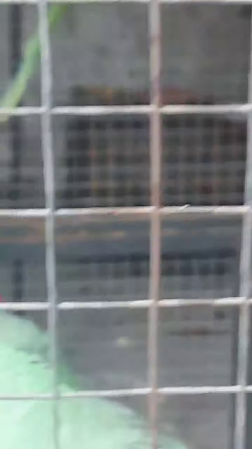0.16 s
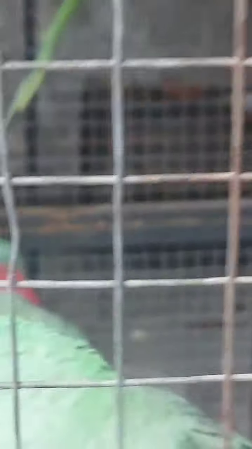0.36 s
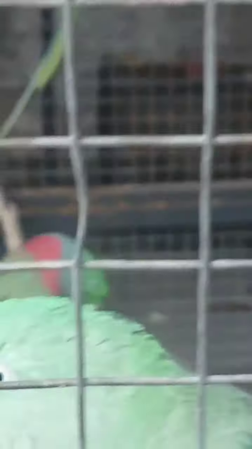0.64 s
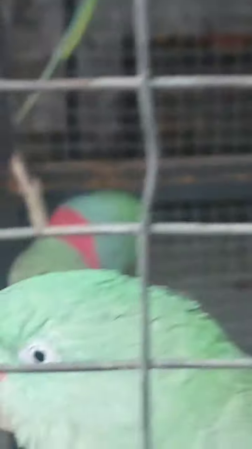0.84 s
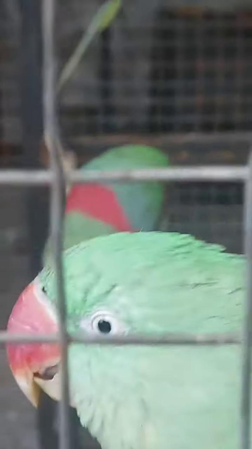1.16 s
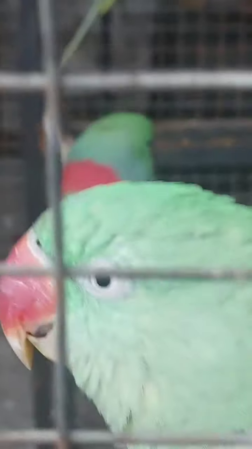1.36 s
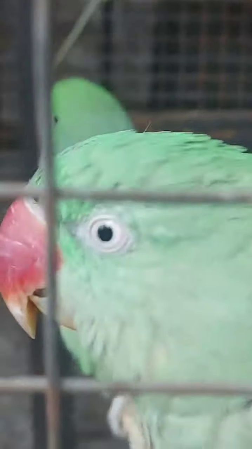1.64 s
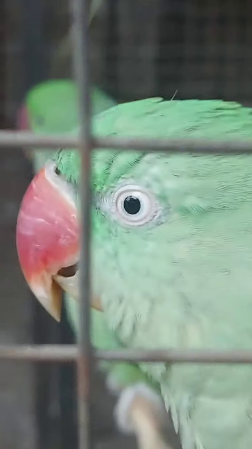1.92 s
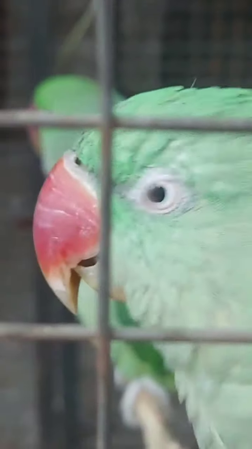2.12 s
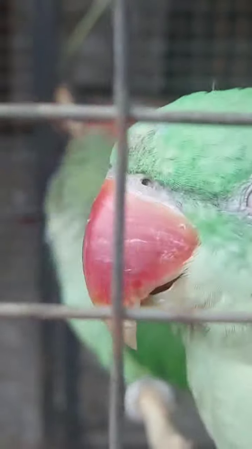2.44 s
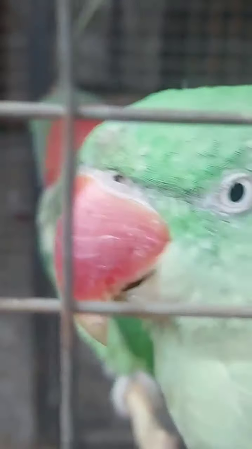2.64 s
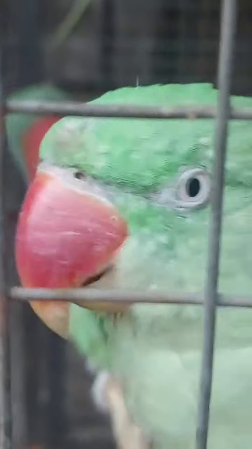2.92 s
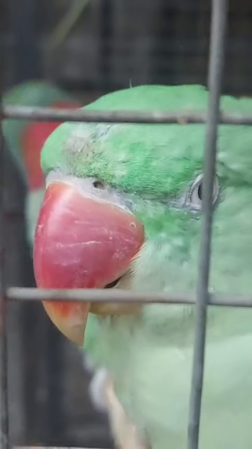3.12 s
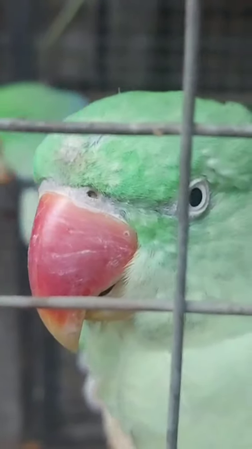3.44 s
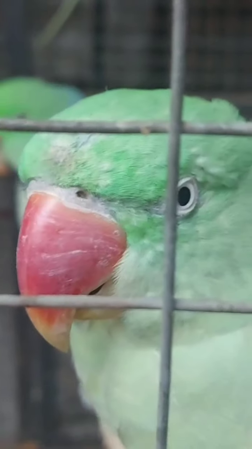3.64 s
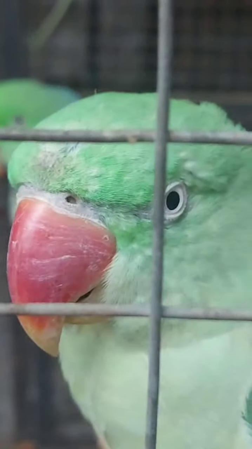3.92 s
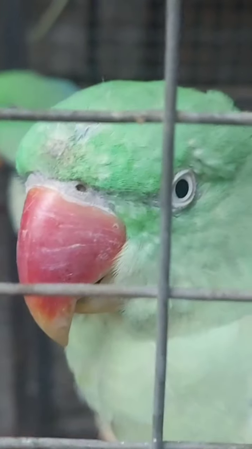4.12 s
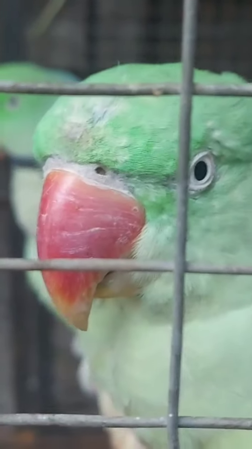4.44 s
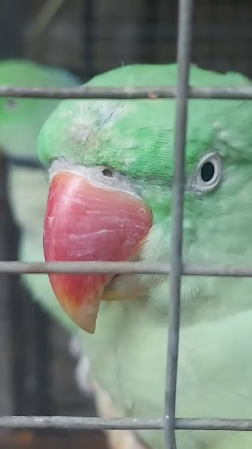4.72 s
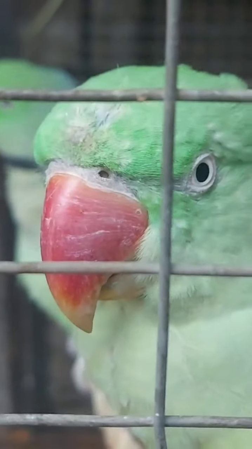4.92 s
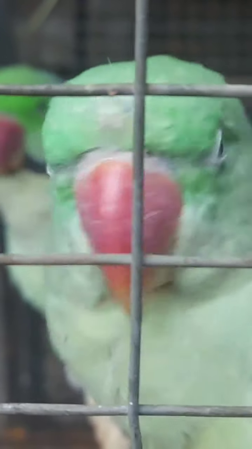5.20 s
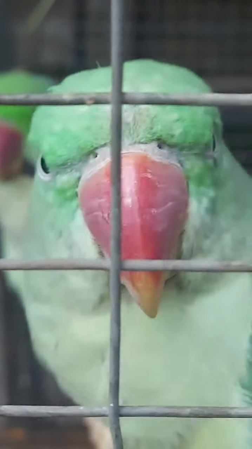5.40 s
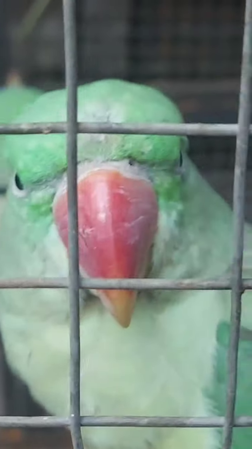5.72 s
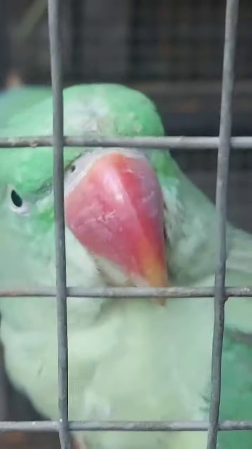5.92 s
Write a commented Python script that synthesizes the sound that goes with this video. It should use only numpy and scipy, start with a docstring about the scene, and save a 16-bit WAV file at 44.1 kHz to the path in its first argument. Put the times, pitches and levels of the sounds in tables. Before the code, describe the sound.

A parakeet whistles three gliding calls close by, then harsh throbbing squawks and small high chirps follow over faint traffic rumble.

```python
"""A parakeet whistles three gliding calls close by, in a wire aviary with hard, reflecting walls.
Smaller birds put in two- and three-note chirps, and a bird to the right answers with throbbing squawks.
Each voice is a source and a filter: membranes in the syrinx vibrate, throat and beak weight their
partials, and breath adds noise. Traffic rumble, a motor hum and faint air noise lie underneath."""
import sys
import numpy as np
from scipy import signal
from scipy.fft import rfft, irfft
from scipy.io import wavfile
from scipy.ndimage import uniform_filter1d

SR = 44100
rng = np.random.default_rng(int(sys.argv[2]) if len(sys.argv) > 2 else 0)


def put_to_file(sound):
    """Save the sound as 16-bit audio at rate SR, in the file named by the first command-line argument."""
    columns = np.atleast_2d(sound).T  # one column per channel
    safe = np.clip(columns, -1, 1)
    whole_steps = np.round(safe * 32767)
    wavfile.write(sys.argv[1], SR, whole_steps.astype(np.int16))


N = 267201


def amp(db):
    """Amplitude ratio: a factor of ten per 20 dB."""
    return 10 ** (np.asarray(db) / 20)


def unit_rms(x):
    """Normalisation to unit mean power."""
    return x / np.sqrt(np.mean(x ** 2) + 1e-20)


def at_hz(points, hz):
    """Interpolation of (f/Hz, value) rows on a logarithmic frequency axis."""
    table_hz, values = np.transpose(points)
    return np.interp(np.log(hz), np.log(table_hz), values)


def envelope(points):
    """Amplitude envelope of the whole scene, interpolated from (t/s, level/dB) rows."""
    return amp(np.interp(np.arange(N) / SR, *np.transpose(points)))


def contours(rows):
    """Linear interpolation of each column after t/s, over the span of one call."""
    times, *columns = np.transpose(rows)
    return [np.interp(np.arange(times[0], times[-1], 1 / SR), times, c) for c in columns]


def wander(size, rate_hz):
    """Random fluctuation: white noise through a two-pole low-pass, at unit rms."""
    r = np.exp(-2 * np.pi * rate_hz / SR)
    return unit_rms(signal.lfilter([1], [1, -2 * r, r * r], rng.standard_normal(size + 9000))[9000:])


def coloured(x, spectrum):
    """Linear filtering: the spectrum is weighted by (f/Hz, gain/dB) rows."""
    hz = np.maximum(np.fft.rfftfreq(x.shape[-1], 1 / SR), 1)
    return irfft(rfft(x) * amp(at_hz(spectrum, hz)), x.shape[-1])


def add(out, start_s, sound, fade_s):
    """Superposition of one sound, faded at both ends."""
    i, k = round(start_s * SR), np.arange(len(sound))
    sound = sound * np.minimum(1, np.minimum(k, k[::-1]) / (fade_s * SR))
    out[i:i + len(sound)] += sound[:N - i]


# Likeness of left and right: f/Hz, coherence (before clipping to 0-1)
COHERENCE = [(60, 1), (240, 0.93), (950, 0.45), (3770, -1.4), (15000, 0.132)]
def diffuse_noise(spectrum):
    """A diffuse field is coherent at two nearby points only at long wavelengths; unit rms."""
    hz = np.maximum(np.fft.rfftfreq(N, 1 / SR), 1)
    coherence = np.clip(at_hz(COHERENCE, hz), 0, 1)
    mid, side = rfft(rng.standard_normal((2, N)))
    pair = np.sqrt(1 + coherence) * mid + np.sqrt(1 - coherence) * side * [[1], [-1]]
    return unit_rms(irfft(pair * amp(at_hz(spectrum, hz)), N))


# Swell of the rumble and the hum: t/s, level/dB
RUMBLE_SWELL = [(0.0, -36), (0.39, -40), (0.72, -34), (0.96, -40.5), (2.33, -43), (2.58, -40), (2.92, -43),
                (4.12, -39), (4.39, -44), (4.72, -44), (6.06, -44.5)]
# Traffic spectrum: f/Hz, relative spectral level/dB
TRAFFIC_SPECTRUM = [(26, -49), (45, -1.5), (102, 0), (183, -8.5), (278, -9.5), (409, -14.5), (724, -20),
                    (1800, -28), (2340, -27.5), (3960, -120)]
def traffic_rumble():
    """Low-frequency noise under slow amplitude modulation."""
    return envelope(RUMBLE_SWELL) * diffuse_noise(TRAFFIC_SPECTRUM)


def motor_hum(centre_hz=113, bandwidth_hz=4):
    """A sharp resonance driven by noise gives a wavering tone; it swells with the rumble."""
    r = np.exp(-np.pi * bandwidth_hz / SR)
    resonator = [1, -2 * r * np.cos(2 * np.pi * centre_hz / SR), r * r]
    return envelope(RUMBLE_SWELL) * unit_rms(signal.lfilter([1], resonator, rng.standard_normal(N)))


# Hiss, a little louder once the flock joins in: t/s, level/dB
AIR_RISE = [(1.5, -54), (2.5, -48)]
# Hiss spectrum: f/Hz, relative spectral level/dB
AIR_SPECTRUM = [(900, -36), (1300, -7.5), (2500, -6.5), (4000, -2), (7500, -4), (9500, -12), (12500, -10.5),
                (15900, -19)]
def air_noise():
    """Diffuse broadband noise, heard as a faint hiss."""
    return envelope(AIR_RISE) * diffuse_noise(AIR_SPECTRUM)


def syrinx(pitch_hz, throat, breath_spectrum, hoarse, jitter, orders,
           tilt_db=0, upper_db=0, half_db=0, phase_shift=0):
    """Source-filter principle: throat and beak weight the membranes' partials; hoarseness adds breath."""
    pitch_hz = pitch_hz * (1 + jitter * wander(len(pitch_hz), 179))
    phase = 2 * np.pi * np.cumsum(pitch_hz) / SR + phase_shift
    tone, power = 0, 1e-12
    for k in orders:
        source_db = tilt_db * np.log2(min(k, 3)) + upper_db * (k > 3) + half_db * (k % 1 > 0)
        gain = amp(source_db + at_hz(throat, k * pitch_hz)) * (k * pitch_hz < 17000)
        tone += gain * np.sin(k * phase + k * k)
        power += gain ** 2 / 2
    breath = unit_rms(coloured(rng.standard_normal(len(phase)), breath_spectrum))
    breath_share = np.clip(hoarse, 0, 1) ** 2
    return np.sqrt(1 - breath_share) * tone / np.sqrt(power) + np.sqrt(breath_share) * breath


# Pitch glides, one list per call: t/s, f/Hz, relative level/dB
WHISTLE_GLIDES = [
    [(0.015, 704, -61), (0.037, 753, -38.5), (0.099, 886, -33), (0.141, 1057, -16), (0.173, 1320, -12.5),
     (0.19, 1386, -35)],
    [(0.3, 738, -46), (0.334, 773, -39.5), (0.4, 894, -26), (0.464, 1219, -10), (0.484, 1396, -16),
     (0.5, 1392, -36)],
    [(0.66, 716, -43), (0.702, 732, -31), (0.81, 1010, -14), (0.872, 1385, -9), (0.9, 1464, -13),
     (0.97, 1455, -13), (1.022, 1412, -14.5), (1.11, 1222, -16), (1.308, 870, -28), (1.402, 784, -39.5),
     (1.42, 739, -94)],
]
# Resonances of throat and beak: f/Hz, gain/dB
WHISTLE_FORMANTS = [(700, -12.5), (1400, 9), (2200, 12), (2900, 1), (3600, -12.5), (4300, -25), (4900, -35),
                    (5800, -15.5), (6500, -27.5), (7600, -13), (8600, -36), (9600, -52), (11500, -31),
                    (13000, -36), (15000, -37)]
# Breath noise: f/Hz, relative spectral level/dB
WHISTLE_BREATH_SPECTRUM = [(1200, -8), (2500, -8), (5000, -10.5), (7800, -2.5), (10000, -8), (12200, -9),
                           (15500, -48)]
# Slope up to the third partial, brighter on high notes: fundamental f/Hz, slope/(dB per octave)
WHISTLE_TILT = [(750, -26), (880, -14), (1050, -5.5), (1220, 10), (1450, 19)]
# Lift of the partials above the third: fundamental f/Hz, gain/dB
WHISTLE_UPPER_LIFT = [(750, 1), (950, 7.5), (1150, 4.5), (1300, -2.5), (1450, -2.5)]
# Breathiness of a rising note: fundamental f/Hz, hoarseness (0-1)
WHISTLE_BREATHINESS = [(750, .03), (1100, .07), (1400, .04)]
def whistles():
    """Harmonic glides; on high notes a slower oscillation modulates level and phase, adding sidebands."""
    out = np.zeros(N)
    for glide in WHISTLE_GLIDES:
        pitch_hz, level_db = contours(glide)
        rising = uniform_filter1d(1. * (np.gradient(pitch_hz) > 0), size=900)
        hoarse = rising * at_hz(WHISTLE_BREATHINESS, pitch_hz)
        depth = .07 * np.clip((pitch_hz - 1150) / 250, 0, 1)
        slow_phase = 2 * np.pi * np.cumsum(.28 * pitch_hz) / SR
        tremble = amp(wander(len(pitch_hz), 110)) * (1 + depth * np.cos(slow_phase))
        voice = syrinx(pitch_hz, WHISTLE_FORMANTS, WHISTLE_BREATH_SPECTRUM, hoarse,
                       jitter=0.13 * hoarse, orders=np.arange(1, 16),
                       tilt_db=at_hz(WHISTLE_TILT, pitch_hz),
                       upper_db=at_hz(WHISTLE_UPPER_LIFT, pitch_hz),
                       phase_shift=depth * np.sin(slow_phase))
        add(out, glide[0][0], amp(level_db) * tremble * voice, fade_s=.006)
    return out


# Notes of the smaller birds: t/s, duration/s, start f/Hz, end f/Hz, relative level/dB
CHIRP_NOTES = [(1.642, 0.074, 5300, 5660, -68), (2.585, 0.061, 6520, 6950, -48.5),
               (2.601, 0.043, 4590, 4655, -39), (2.875, 0.021, 2567, 2495, -33.5),
               (2.895, 0.014, 6580, 6870, -24.5), (3.085, 0.031, 2514, 2557, -41.5),
               (3.106, 0.034, 6520, 6720, -32.5), (3.322, 0.061, 2224, 2530, -45.5),
               (3.356, 0.1, 4710, 4440, -36), (3.387, 0.017, 2680, 2640, -31.5),
               (3.399, 0.042, 6880, 6110, -31), (3.728, 0.021, 3020, 4220, -48),
               (3.739, 0.028, 2470, 2710, -34.5), (3.76, 0.022, 6190, 6250, -27),
               (4.472, 0.048, 2414, 2350, -38.5), (4.486, 0.083, 6100, 6410, -37.5),
               (4.701, 0.054, 2427, 2425, -39), (4.719, 0.036, 6230, 6320, -34),
               (5.11, 0.053, 2433, 2295, -40.5), (5.132, 0.043, 5960, 6120, -32),
               (5.163, 0.041, 5170, 5050, -36), (5.45, 0.042, 2415, 2353, -40.5),
               (5.471, 0.033, 6460, 6070, -28), (5.506, 0.022, 5180, 5320, -32)]
# Resonances of throat and beak: f/Hz, gain/dB
CHIRP_FORMANTS = [(2400, -3.5), (5000, 8), (6500, 9.5), (7500, 1.5), (10000, -10), (12800, -4.5),
                  (15500, -16)]
def chirps(clear_db=-33):
    """Short linear sweeps, whose partials are broadened by random modulation of level and pitch."""
    out = np.zeros(N)
    for start_s, length_s, start_hz, end_hz, level_db in CHIRP_NOTES:
        pitch_hz = np.linspace(start_hz, end_hz, round(length_s * SR))
        hoarse = .017 * (clear_db - level_db)   # weaker notes are breathier
        jitter = max(.022, .5 * length_s)   # longer notes are scratchier
        flutter = amp(3.26 * wander(len(pitch_hz), 450))
        breath_band = [(.58 * end_hz, -30), (.88 * end_hz, 0), (1.07 * end_hz, 0),
                       (1.7 * end_hz, -14), (16000, -20)]
        voice = syrinx(pitch_hz, CHIRP_FORMANTS, breath_band, hoarse, jitter, orders=np.arange(1, 7))
        add(out, start_s, amp(level_db) * flutter * voice, fade_s=.01)
    return out


def squawk_stages(start_s, rasp_s, voice_s, start_hz, end_hz, rasp_db, early_db, late_db, half_db):
    """Regimes of oscillation: a noisy rasp, a clear tone, period doubling (half-order partials), decay."""
    catch_s, swell_s, break_s, release_s = .0092, .036, .016, .013
    onset = start_s + rasp_s
    swollen, end = onset + catch_s + swell_s, onset + voice_s
    broken = end - release_s
    held = broken - break_s
    # t/s, level offset/dB, half-order gain/dB, hoarseness (0-1)
    times, offset_db, halves_db, hoarse = np.transpose([
        (start_s, -4.8, -1.5, .55),
        (onset, 2.7, -2.1, .9),
        (onset + catch_s, -5.5, -48, .27),
        (swollen, 0, -70, .017),
        ((swollen + held) / 2, 0, half_db, .02),
        (held, 0, half_db, .02),
        (broken, 1, -5, .32),
        (end, -8, -15, .3)])
    voice_db = np.interp(times, [swollen, held], [early_db, late_db])
    level_db = offset_db + np.where(times <= onset, rasp_db, voice_db)
    sag = np.clip((times - onset) / voice_s, 0, 1) ** .69   # the pitch falls fastest early on
    release_drop_hz = 95 * (times > broken)
    pitch_hz = start_hz + (end_hz - start_hz) * sag - release_drop_hz
    return np.transpose([times, pitch_hz, level_db, halves_db, hoarse])


# Answering calls: t/s, rasp duration/s, voice duration/s, start f/Hz, end f/Hz,
# relative level/dB (rasp, early, late), mid-call half-order gain/dB, throb f/Hz
SQUAWK_CALLS = [(1.748, 0.03, 0.19, 2235, 2006, -40.5, -25, -22, -16, 101.5),
                (2.086, 0.013, 0.15, 2250, 2028, -34.5, -22, -21, -3, 83.5),
                (2.366, 0.016, 0.15, 2243, 2083, -33.5, -23, -24, -1, 94),
                (2.644, 0.015, 0.14, 2212, 2062, -33.5, -22.5, -24, 3, 82),
                (4.153, 0.031, 0.19, 2210, 1942, -28, -17.5, -22, -20, 92),
                (4.47, 0.027, 0.17, 2200, 1975, -36, -20, -21, -11, 76),
                (4.783, 0.01046, .164, 2210, 2014, -32.5, -23, -22, -3, 90.5),
                (5.678, 0.017, 0.17, 2083, 1873, -36.5, -21, -23, -11, 95),
                (5.98, 0.027, 0.12, 2104, 1970, -36, -21, -27, -25, 77)]
# Resonances of throat and beak: f/Hz, gain/dB
SQUAWK_FORMANTS = [(1000, -51), (2100, -7), (3100, -11), (4200, 8.5), (5200, -10), (6200, -6), (7800, -6.5),
                   (9200, -21.5), (11000, -21), (13000, -32), (15500, -27)]
# Breath noise: f/Hz, relative spectral level/dB
SQUAWK_BREATH_SPECTRUM = [(1200, -19.5), (2100, -7), (3100, -5), (4200, -3.5), (5200, 0), (6200, 1.5),
                          (8000, -0.5), (9200, -8), (15500, -35)]
def squawks(pitch_swing=.033, treble_hiss_db=-28):
    """Frequency and amplitude modulation by a second, slow oscillation break each partial into pulses."""
    out = np.zeros(N)
    treble = signal.butter(4, 8500, "high", fs=SR, output="sos")
    for *call, throb_hz in SQUAWK_CALLS:
        pitch_hz, level_db, half_db, hoarse = contours(squawk_stages(*call))
        size = len(pitch_hz)
        throb = 2 * np.pi * np.cumsum(throb_hz * (1 + .12 * wander(size, 37.3))) / SR
        pitch_hz = pitch_hz * (1 + pitch_swing * np.sin(throb))
        pulses = 1 + .6 * np.cos(throb - 1.2) + .4 * np.cos(2 * throb + 1.2 * wander(size, 19))
        voice = syrinx(pitch_hz, SQUAWK_FORMANTS, SQUAWK_BREATH_SPECTRUM, hoarse ** 1.31,
                       jitter=.005 + .042 * hoarse ** 2, orders=np.arange(1, 16) / 2, half_db=half_db)
        treble_noise = signal.sosfilt(treble, rng.standard_normal(size))
        treble_hiss = amp(treble_hiss_db) * (1 - hoarse) * treble_noise
        flutter = amp(2.18 * wander(size, 53))
        add(out, call[0], amp(level_db) * pulses * flutter * (voice + treble_hiss), fade_s=.002)
    return out


# Reverberation time of the near walls: f/Hz, T60/s
NEAR_WALL_T60 = [(1000, 0.27), (4000, 0.28), (7000, 0.21), (13000, 0.18)]
def wall_response(far_db=-21.5, far_t60_s=1):
    """Reverberation: each octave decays exponentially; farther walls ring on, weaker and longer."""
    t, tail = np.arange(SR) / SR, 0
    white = rng.standard_normal((2, len(t)))
    far_decay = amp(far_db - 60 * t / far_t60_s)
    for low_hz in 500 * 2 ** np.arange(5):
        octave = signal.butter(2, [low_hz, 2 * low_hz], "band", fs=SR, output="sos")
        near_decay = amp(-60 * t / at_hz(NEAR_WALL_T60, low_hz * np.sqrt(2)))
        tail += signal.sosfilt(octave, white) * (near_decay + far_decay)
    tail *= np.clip((t - .003) / .00067, 0, 1)   # the nearest wall answers after 3 ms
    return tail / np.sqrt(np.sum(tail ** 2) / 2)


def placed(x, tail, lag_s, wet_db, left_wet_db, shadow):
    """Localisation: direct sound reaches the left later and shadowed (f/Hz, gain/dB); both sides echo."""
    left = np.interp(np.arange(N) - lag_s * SR, np.arange(N), coloured(x, shadow))
    echo = signal.fftconvolve(x[None], tail)[:, :N] * amp([[wet_db + left_wet_db], [wet_db]])
    return np.array([left, x]) + echo


def scene():
    """Superposition of three voices in one reverberant enclosure, over the background."""
    tail = wall_response()
    near = placed(amp(-.5) * whistles(), tail, lag_s=.00005, wet_db=-17.5, left_wet_db=1.1,
                  shadow=[(1000, -.5), (2500, -3), (6000, -8)])
    right = placed(amp(7.5) * squawks(), tail, lag_s=.0003928, wet_db=.7, left_wet_db=-.77,
                   shadow=[(2000, -3.5), (3000, 0), (4200, -11.5), (6200, -6.5), (8000, -5), (13000, 5)])
    small = placed(amp(10.5) * chirps(), tail, lag_s=.000398, wet_db=-.46, left_wet_db=-3,
                   shadow=[(2500, -1), (6000, -44), (8000, -4), (13000, -3.5)])
    return near + right + small + amp(-7.5) * motor_hum() + traffic_rumble() + air_noise()


def record(dry, ceiling=1.15):
    """Band limiting and saturation: the lowest bass is cut, peaks are rounded, the top is cut."""
    bass_cut = signal.butter(4, 42, "high", fs=SR, output="sos")
    top_cut = signal.ellip(14, .5, 80, 15850, fs=SR, output="sos")
    rounded = ceiling * np.tanh(signal.sosfilt(bass_cut, dry) / ceiling)
    return signal.sosfilt(top_cut, rounded)


dry = scene()
out = record(dry)
put_to_file(out)
```